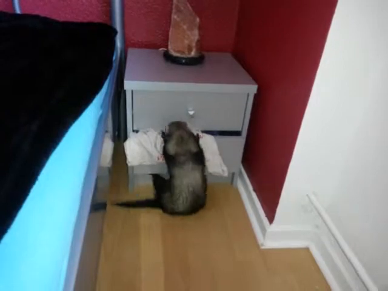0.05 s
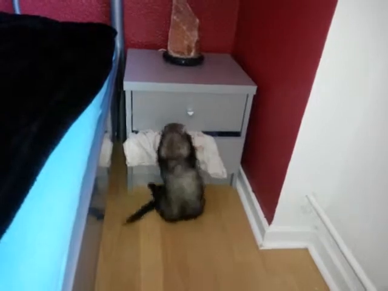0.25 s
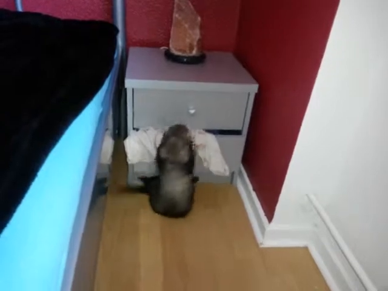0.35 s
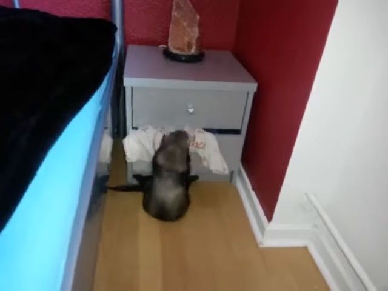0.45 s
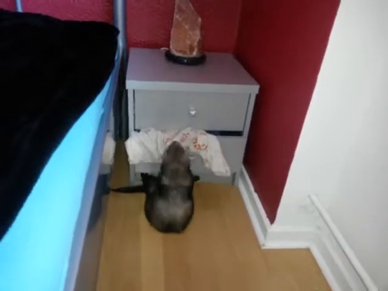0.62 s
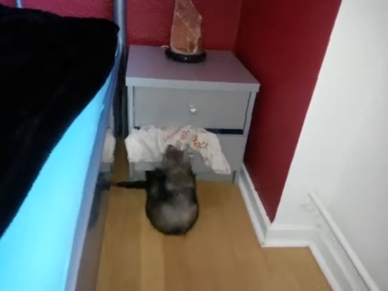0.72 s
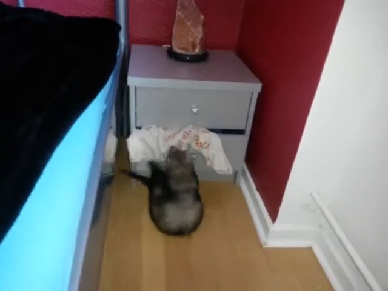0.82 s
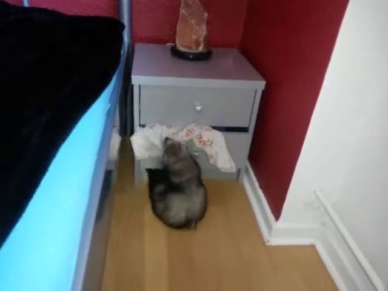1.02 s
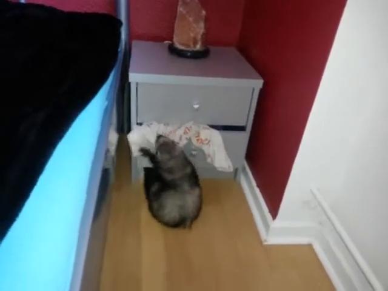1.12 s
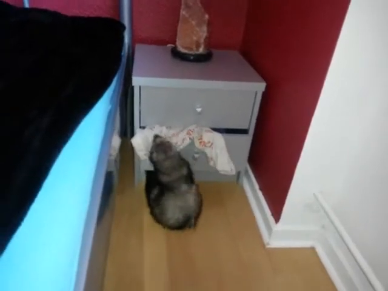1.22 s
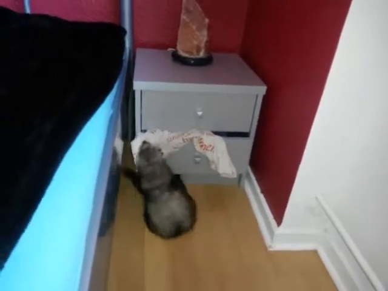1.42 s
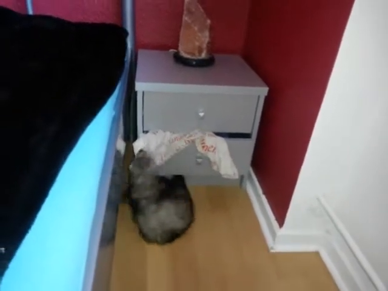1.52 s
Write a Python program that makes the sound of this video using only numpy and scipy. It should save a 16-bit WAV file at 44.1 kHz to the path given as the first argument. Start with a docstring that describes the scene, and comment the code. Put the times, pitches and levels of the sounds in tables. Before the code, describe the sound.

A ferret scratches at a wooden drawer in a small bedroom. Its claws click and scrape while the drawer knocks hollowly, then the pawing thins into lighter clicks and soft cloth rustling over faint hiss.

```python
"""Ferret at a bedside drawer

In a small bedroom, a ferret paws at a wooden drawer with a cloth hanging out of it. Its claws
click and scrape as they catch and slip on the panel. The loose drawer booms and clacks in its
frame and shifts under the animal's weight. The cloth rustles as the ferret slides down to the
floor and noses along it, ending in a duller rustle or sniff. Faint hiss and rumble lie underneath."""
import sys
import numpy as np
from scipy import signal
from scipy.fft import rfft, irfft
from scipy.io import wavfile

SR = 44100
rng = np.random.default_rng(int(sys.argv[2]) if len(sys.argv) > 2 else 0)


def transcribe(signal):
    """Save signal, clipped to [-1, 1], as a 16-bit WAV file at the path in sys.argv[1]."""
    frames = np.atleast_2d(signal).T
    limited = np.clip(frames, -1, 1)
    pcm = np.round(limited * 32767).astype(np.int16)
    wavfile.write(sys.argv[1], SR, pcm)


N = 68355
T = np.arange(N) / SR
FFT_SIZE = 2 ** 17
HZ = np.maximum(np.arange(FFT_SIZE // 2 + 1) * SR / FFT_SIZE, 1)

# The drawer knocks in its frame and paws tap its front:
# (time [s], boom level [dB], change for the deepest tones [dB], clack level [dB], clack pitch [Hz])
KNOCKS = [(.001, -36.5, -12.5, -49, 628), (0.029, -46, -9.5, -57.5, 910), (0.201, -47.5, 0, -51, 1030),
          (0.216, -40.5, -5, -51.5, 1240), (0.244, -53, 7, -57, 895), (0.276, -43, 3, -49, 823),
          (.333, -41.5, -15, -57.5, 1160), (0.463, -49, -7, -48, 1410), (.482, -33, -6, -48, 1240),
          (0.498, -33, -2.5, -39, 1270), (.541, -38, 1.5, -61, 1100), (.572, -46.5, 13.5, -61, 585),
          (.628, -42, -0.5, -47.5, 785), (0.726, -59, 15.5, -68, 794), (.981, -63, 0, -56, 1960),
          (1.079, -68, 18, -56, 1780), (1.165, -57, 4, -56.5, 610), (1.182, -55.5, 4, -58.5, 990),
          (1.243, -57.5, 5, -82, 686)]


def from_db(db):
    """Turn decibels into a number to multiply by."""
    return 10 ** (np.asarray(db) / 20)


def rms_one(x):
    """Scale a sound to an average (rms) level of 1."""
    return x / np.sqrt(np.mean(x ** 2) + 1e-20)


def unit_energy(x):
    """Scale each channel to a total energy of 1."""
    return x / np.sqrt(np.sum(x ** 2, axis=-1, keepdims=True) + 1e-20)


def at_hz(points, hz=HZ):
    """Read between the rows of a frequency table, with octaves evenly spaced."""
    frequencies, values = np.transpose(points)
    return np.interp(np.log(hz), np.log(frequencies), values)


def level(points):
    """Turn (time [s], level [dB]) points into a volume curve."""
    return from_db(np.interp(T, *np.transpose(points)))


def colour(x, db):
    """Turn each frequency, from 0 Hz to SR / 2, up or down by db."""
    cepstrum = irfft(np.log(from_db(db)))
    n = len(cepstrum)
    # minimum phase: the filter rings after a sound, never before it
    cepstrum[1:n // 2] *= 2
    cepstrum[n // 2 + 1:] = 0
    response = np.exp(rfft(cepstrum))
    return irfft(rfft(x, n) * response, n)[..., :x.shape[-1]]


def add(out, start_s, sound):
    """Mix a sound in at the given time."""
    i = max(int(start_s * SR), 0)
    out[..., i:i + sound.shape[-1]] += sound[..., :N - i]


def spread(pair):
    """Blend two unrelated signals into a wide sound: alike in the bass, unlike in the treble."""
    # How alike left and right are: (frequency [Hz], likeness [0-1])
    likeness = [(100, 0.82), (300, 0.79), (700, 0.75), (1500, 0.071), (4000, 0), (14000, 0)]
    alike = np.clip(at_hz(likeness), 0, .99)
    mid, side = rfft(pair, FFT_SIZE) * np.sqrt([1 + alike, 1 - alike])
    return irfft(np.array([mid + side, mid - side]))[:, :pair.shape[1]]


def noise(tone):
    """Wide stereo noise with the given tone, at an average level of 1."""
    white = rng.standard_normal((2, N))
    return rms_one(colour(spread(white), at_hz(tone)))


def slips(n, per_s, spread_db):
    """Tiny slips of uneven size at random moments, separate for left and right."""
    out = np.zeros((2, n))
    for channel in out:
        happens = rng.random(n) < per_s / SR
        direction = rng.choice([-1, 1], n)
        strength = from_db(spread_db * np.minimum(rng.exponential(1, n), 4))
        channel[:] = happens * direction * strength
    return out


def background():
    """A faint, steady hiss and rumble."""
    # Tone of the background: (frequency [Hz], level [dB])
    tone = [(15, -7), (28, -13), (45, 18), (70, 6), (115, 10), (170, 1), (280, -13.5), (600, 1),
            (1200, -7.5), (2800, -7.5), (4400, -4.5), (6800, -7.5), (8300, 1), (9200, -17), (14500, -13)]
    return from_db(-63.5) * noise(tone)


def cloth_rustle():
    """Fibres catch and let go as the cloth is dragged, in uneven little tugs."""
    # How loud the dragged cloth is: (time [s], level [dB])
    loudness = [(0, -47.5), (.04, -48.5), (.08, -57.5), (.13, -54.5), (.19, -51.5), (.26, -55), (.31, -50),
                (.56, -47), (.64, -53.5), (.68, -47.5), (.72, -48), (.77, -42), (.82, -51.5), (.9, -54),
                (.96, -53), (1.11, -47), (1.145, -54.5), (1.22, -55), (1.28, -57), (1.42, -70),
                (1.46, -52.5), (1.55, -49)]
    # Tone of the rustle: (frequency [Hz], level [dB])
    tone = [(150, -28), (500, -12), (1000, -16), (1900, -13.5), (3200, -11), (4300, -8.5), (5800, -5),
            (7000, 2.5), (8200, 2), (9400, -6), (11000, -11.5), (12500, -12), (14500, -18)]
    tug_db, tugs_per_s = 2.5, 70
    fibres = slips(N, per_s=9000, spread_db=2)
    tugs = from_db(tug_db * np.interp(T * tugs_per_s, np.arange(N), rng.standard_normal(N)))
    rustle = colour(spread(fibres * tugs), at_hz(tone))
    return level(loudness) * rms_one(rustle)


def drawer_shift():
    """The drawer rumbles as it shifts under the animal's weight."""
    # How loud the shifting is: (time [s], level [dB])
    loudness = [(0, -66), (.1, -59.5), (.18, -53.5), (.21, -47.5), (.35, -51), (.43, -58), (.49, -43.5),
                (.55, -47), (.65, -58), (.72, -63), (.95, -66), (1.1, -64), (1.2, -59), (1.3, -70),
                (1.45, -65), (1.55, -58)]
    # Tone of the shifting wood: (frequency [Hz], level [dB])
    tone = [(25, -21), (42, -9), (62, -39), (95, 2.5), (130, -8.5), (175, -10.5), (250, 0.5), (310, -1.5),
            (450, -13.5), (800, -17.5), (1250, -14), (2000, -18.5), (5000, -25)]
    return level(loudness) * noise(tone)


def drawer_booms():
    """Each knock sets the cabinet ringing; the spot hit decides how strong the deepest tones are."""
    # Natural tones of drawer and cabinet: (frequency [Hz], level [dB], time to fade by 60 dB [s])
    modes = [(41, -22, .6), (90.2, -15.5, 0.57), (120.7, -10, 0.29), (137.5, -7, 0.39), (201, -31, 0.45),
             (230, -4.5, 0.15), (240, -4, 0.14), (289, -5, 0.19), (334, -18, 0.14), (405, -21, 0.13)]
    push_s, deep_below_hz = 0.0025, 180
    out, t = np.zeros(N), T[:SR // 2]
    rings = np.array([from_db(db - 60 * t / fade_s) * np.cos(2 * np.pi * hz * t)
                      for hz, db, fade_s in modes])
    is_deep = np.array(modes)[:, 0] < deep_below_hz
    for start_s, db, deep_db, _, _ in KNOCKS:
        add(out, start_s, from_db(db + deep_db * is_deep) @ rings)
    push = np.hanning(int(push_s * SR) + 3)  # a short, smooth push softens each knock
    return signal.fftconvolve(out, push / push.sum())[:N]


def drawer_clacks(size=8192):
    """Each knock also rattles many brief tones of the drawer front; the spot hit favours a pitch."""
    # Tone of the drawer front: (frequency [Hz], level [dB])
    tone = [(150, -20), (350, 5), (590, 5.5), (700, -3), (1200, 1), (1450, -6), (1900, -1.5), (4000, -18)]
    fade_s, peak_db, peak_octaves = 0.053, 14, 0.21
    energy_s = 0.0091  # a clack holds the energy of this long a sound at its level
    out, t = np.zeros((2, N)), T[:size // 2]
    hz = np.linspace(1, SR / 2, size // 2 + 1)
    for start_s, _, _, db, pitch_hz in KNOCKS:
        rattle = rng.standard_normal((2, len(t))) * from_db(-60 * t / fade_s)
        boost_db = peak_db / (1 + (np.log2(hz / pitch_hz) / peak_octaves) ** 2)
        clack = unit_energy(colour(rattle, at_hz(tone, hz) + boost_db))
        add(out, start_s, from_db(db) * np.sqrt(energy_s * SR) * clack)
    return spread(out)


def scratch_tone(x, mid_db, top_db, size=8192):
    """The bright ring of clicks and scratchy strokes, with more or less midrange and top treble."""
    # Overall tone of the scratching: (frequency [Hz], level [dB])
    tone = [(200, -39), (900, -30), (2200, -19), (3400, -17), (5000, -10.5), (6200, -9.5), (6900, -2.5),
            (7600, -2), (8300, -1.5), (9000, -9.5), (9800, -12.5), (11000, -14), (12200, -26),
            (14500, -28.5)]
    # Narrow rings in the scratching: (frequency [Hz], width [Hz], level change [dB])
    rings = [(3060, 340, 2.5), (4170, 100, 3.5), (6300, 91, 9.5), (6940, 130, -1), (6900, 200, 7),
             (7540, 68, 1), (7910, 103, 9), (8510, 64, 7), (8950, 120, 4.5), (10830, 280, 6.5)]
    mid_below_hz, top_above_hz = 4720, 8650
    hz = np.linspace(1, SR / 2, size // 2 + 1)
    shelves_db = mid_db / (1 + (hz / mid_below_hz) ** 6) + top_db / (1 + (top_above_hz / hz) ** 12)
    rings_db = sum(db / (1 + (2 * (hz - centre) / width) ** 2) for centre, width, db in rings)
    return colour(x, at_hz(tone, hz) + shelves_db + rings_db)


def claw_clicks():
    """A claw catches and snaps free in a burst of slips a few milliseconds long."""
    # Claw snaps: (time [s], level [dB], length [s], midrange [dB], top treble [dB])
    clicks = [(0.094, -47.5, 0.0055, 11, 0), (0.2767, -28.5, 0.0011, -14.5, -4.5),
              (.2787, -29.5, 0.0011, -10.5, -3), (0.375, -41, 0.0023, 6, -21),
              (0.397, -22, 0.0016, -5, -9.5), (.4043, -29.5, 0.0024, -16, -36),
              (0.4079, -38, 0.0027, 1, -15), (0.411, -29.5, 0.0012, -4.5, 2), (0.499, -23.5, 0.003, -28, 4),
              (.502, -15.5, .0035, -4.5, 4), (.628, -45, 0.0062, -1, -14), (0.663, -44, 0.0043, -2, 10),
              (.981, -42, 0.0042, 12.5, 1), (1.171, -33.5, 0.0039, -1.5, 1), (1.177, -30, 0.0036, 4, 10),
              (1.309, -49.5, 0.0087, -17, -10), (1.364, -50.5, 0.0057, 12, 3), (1.37, -47, 0.0082, -14, 2),
              (1.4356, -42, 0.0039, 0.5, -20), (1.442, -45.5, 0.0052, -2, -5)]
    energy_s = 0.004  # a click holds the energy of this long a sound at its level
    out, t = np.zeros((2, N)), T[:2048]
    for start_s, db, length_s, mid_db, top_db in clicks:
        fade = np.exp(-1.3 * (t / length_s) ** 2)
        burst = slips(len(t), per_s=9000, spread_db=0.5) * fade
        click = unit_energy(scratch_tone(burst, mid_db, top_db))
        add(out, start_s, from_db(db) * np.sqrt(energy_s * SR) * click)
    return out


def scratchy_strokes():
    """Claws stick and slip on the panel; the last two strokes are a duller rustle of cloth or a sniff."""
    # Scratchy strokes: (time [s], length [s], level [dB], midrange [dB], top treble [dB])
    strokes = [(0.155, 0.021, -46, 10, 2.5), (0.193, 0.013, -39, 8.5, 2), (0.206, 0.015, -35, -5.5, -6),
               (0.333, .03, -43.5, 2, -12), (0.364, 0.017, -38, 9.5, -2), (0.403, 0.062, -46, 9, -16),
               (0.455, 0.061, -40, 9, -11), (0.521, 0.039, -41, -13, -11.5), (.74, 0.038, -46, -1, -9),
               (0.925, 0.017, -48.5, 12, 0), (1.017, 0.018, -48.5, -9, -6), (1.049, 0.0066, -50.5, 13, -12),
               (1.069, 0.037, -49.5, 16, -3), (1.172, 0.032, -45.5, 14, 3), (1.461, 0.015, -54, 13, -8),
               (1.479, .08, -43, 3, -10.5)]
    rise_s, fall_s = 0.0029, 0.0073
    out, t = np.zeros((2, N)), T[:8192]
    for start_s, length_s, db, mid_db, top_db in strokes:
        swell = np.minimum(t / rise_s, 1) * np.exp(-np.maximum(t - length_s, 0) / fall_s)
        crackle = slips(len(t), per_s=5700, spread_db=3) * swell
        stroke = unit_energy(scratch_tone(crackle, mid_db, top_db))
        add(out, start_s, from_db(db) * np.sqrt(length_s * SR) * stroke)
    return out


def bedroom(x, early_db):
    """The direct sound, quick echoes off the cabinet and floor, then a short fading tail."""
    early_fade_s = 0.025
    tail_db, tail_rise_s, tail_fade_s = -6, 0.0017, 0.21
    t = T[:SR // 2]
    early, tail = rng.standard_normal((2, 2, len(t)))
    early *= from_db(-60 * t / early_fade_s)
    tail *= from_db(-60 * t / tail_fade_s) * (1 - np.exp(-t / tail_rise_s))
    response = from_db(early_db) * unit_energy(early) + from_db(tail_db) * unit_energy(tail)
    response[:, 0] += 1  # the direct sound
    return signal.fftconvolve(x, unit_energy(response), axes=1)[:, :N]


def scene():
    """Drawer, scratching and cloth over the background; clacks and scratching echo in the room."""
    drawer = drawer_booms() + bedroom(drawer_clacks(), early_db=-19) + drawer_shift()
    scratching = bedroom(claw_clicks(), early_db=-9) + bedroom(scratchy_strokes(), early_db=-3.5)
    return drawer + scratching + cloth_rustle() + background()


def record(dry):
    """The microphone's two openings each change the tone differently; the highest treble is cut."""
    # How much louder left is than right: (frequency [Hz], difference [dB])
    balance = [(100, -2.5), (400, 0), (750, -3), (1300, -3), (3000, 0), (5500, 2.2), (7000, 1), (8400, -7),
               (11000, -2), (14500, -4)]
    cutoff_hz = 14650
    lean_db = at_hz(balance) / 2
    stereo = np.array([colour(dry[0], lean_db), colour(dry[1], -lean_db)])
    treble_cut = signal.ellip(10, .3, 70, cutoff_hz, fs=SR, output="sos")
    return signal.sosfilt(treble_cut, stereo)


dry = scene()
out = record(dry)
transcribe(out)
```